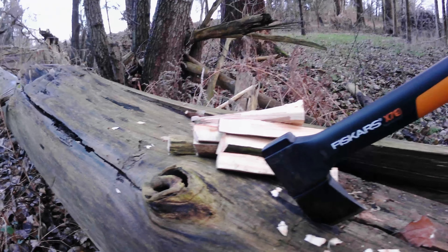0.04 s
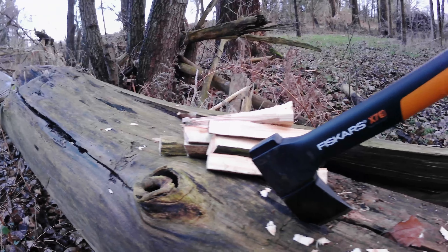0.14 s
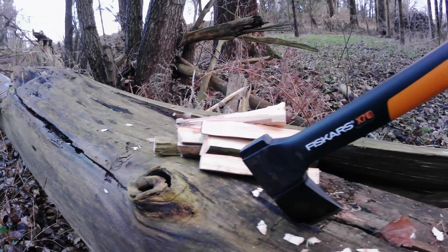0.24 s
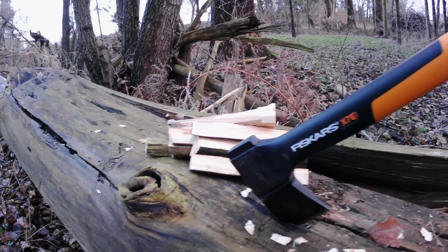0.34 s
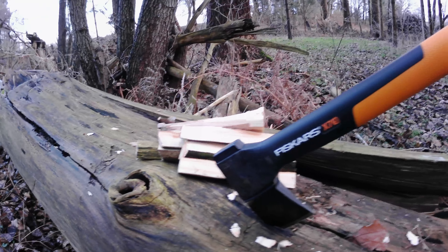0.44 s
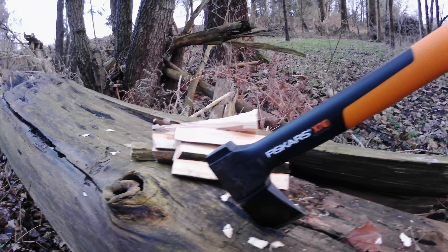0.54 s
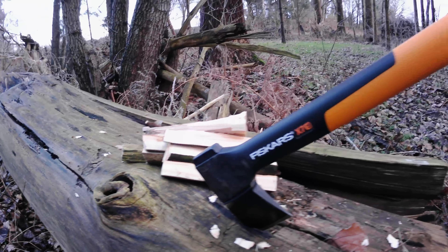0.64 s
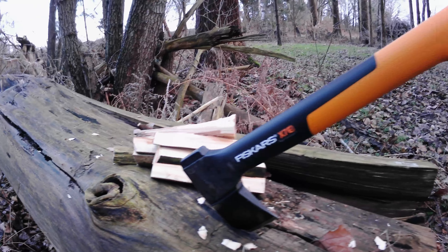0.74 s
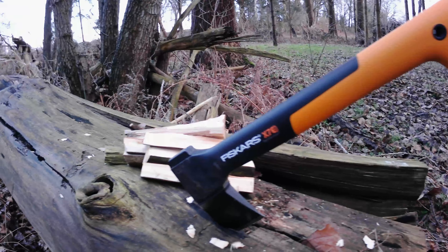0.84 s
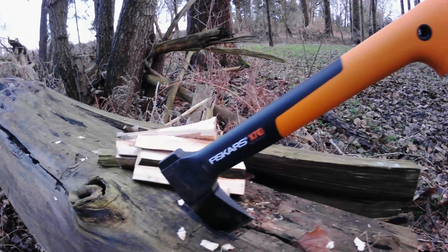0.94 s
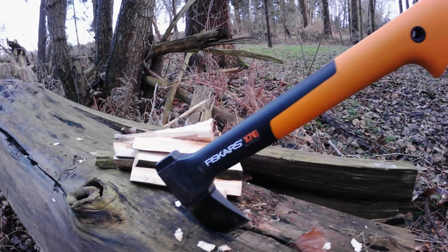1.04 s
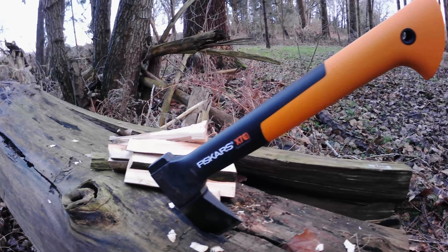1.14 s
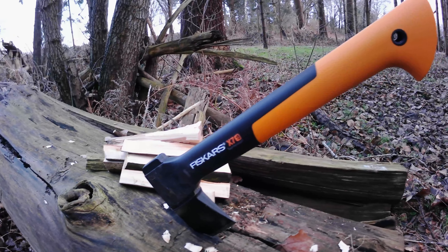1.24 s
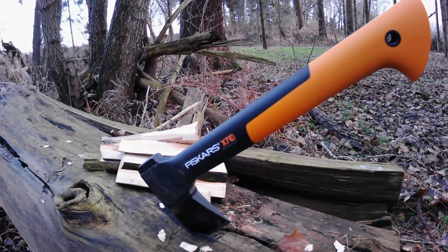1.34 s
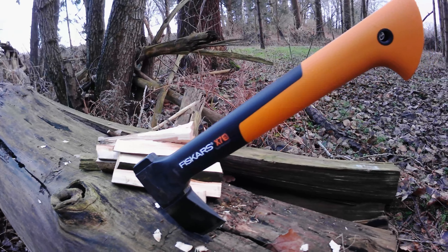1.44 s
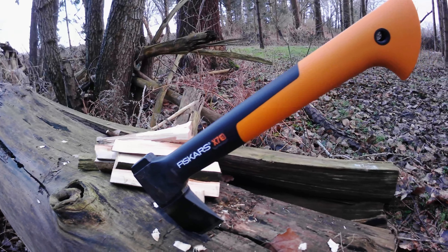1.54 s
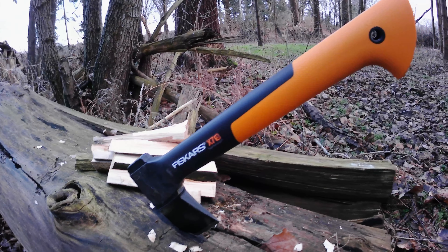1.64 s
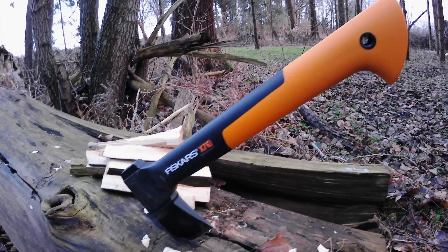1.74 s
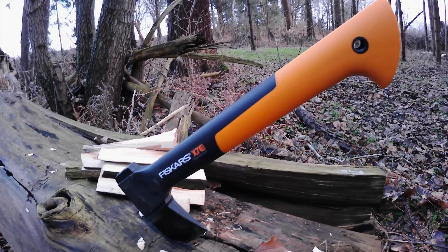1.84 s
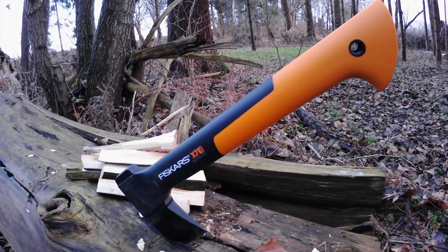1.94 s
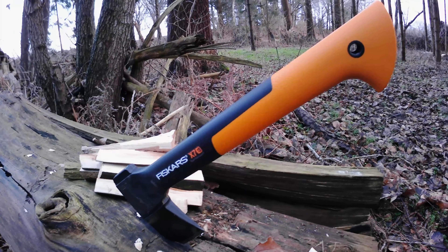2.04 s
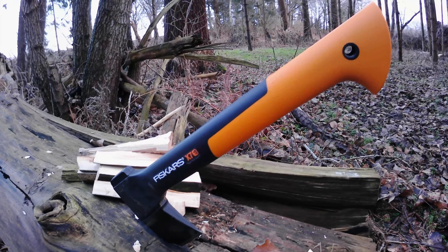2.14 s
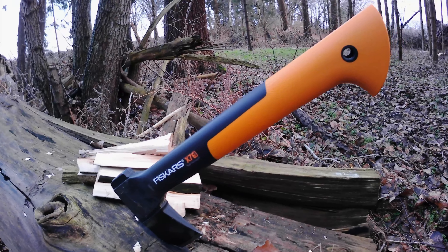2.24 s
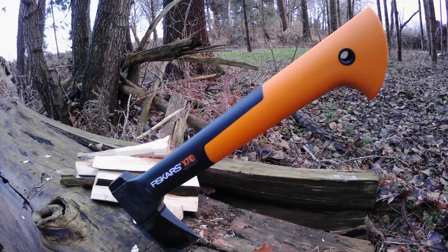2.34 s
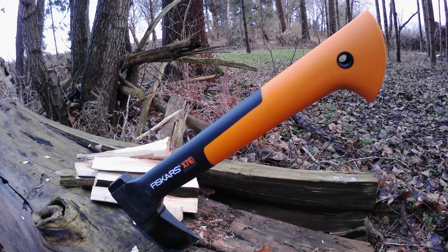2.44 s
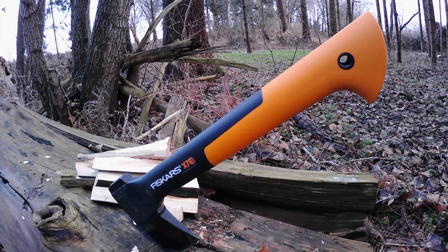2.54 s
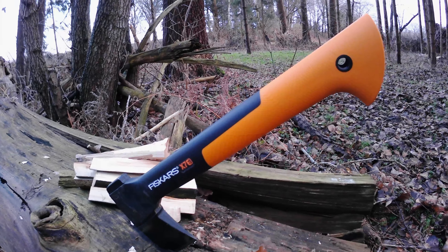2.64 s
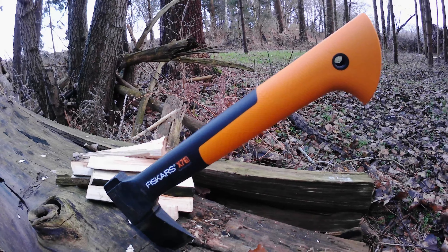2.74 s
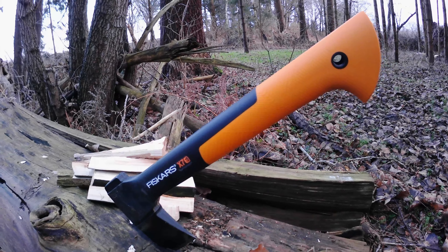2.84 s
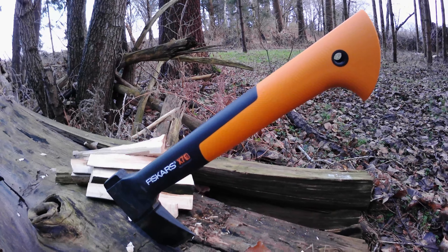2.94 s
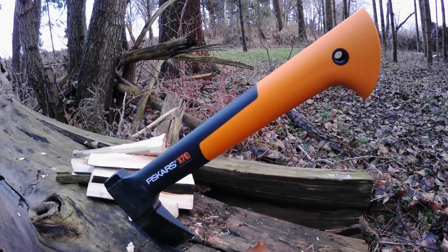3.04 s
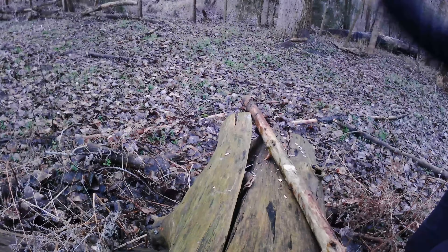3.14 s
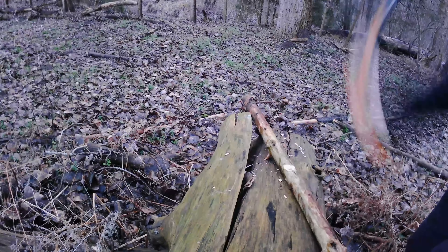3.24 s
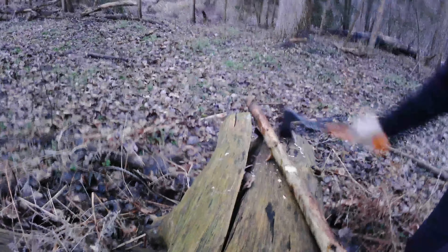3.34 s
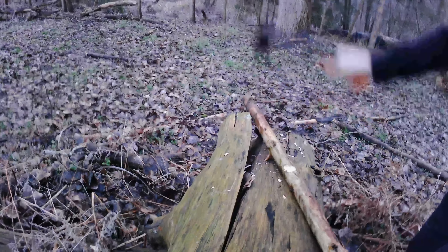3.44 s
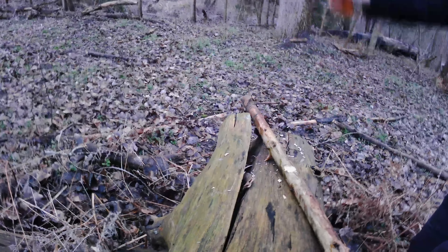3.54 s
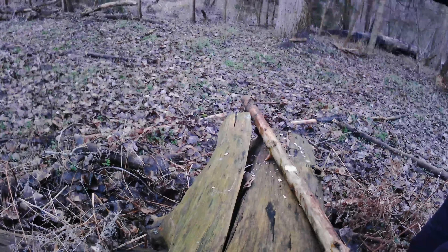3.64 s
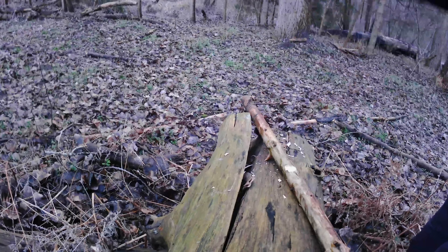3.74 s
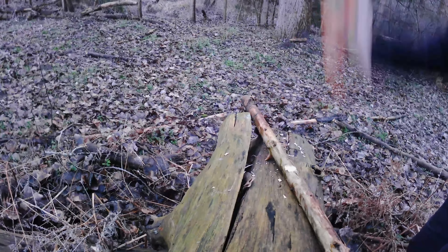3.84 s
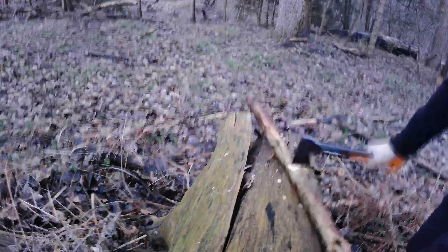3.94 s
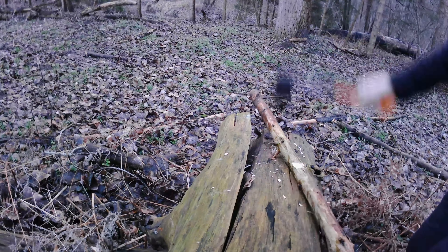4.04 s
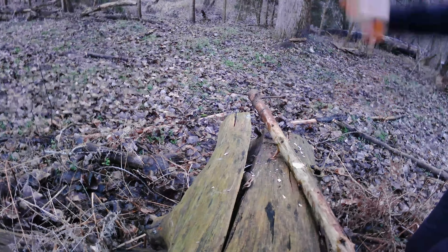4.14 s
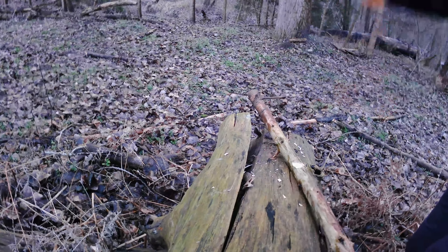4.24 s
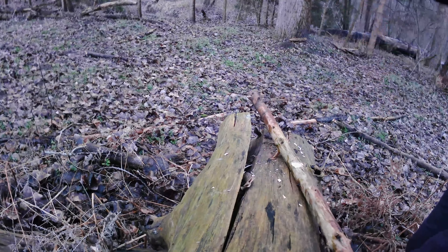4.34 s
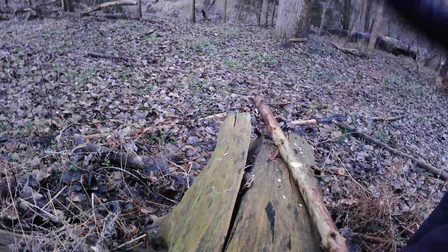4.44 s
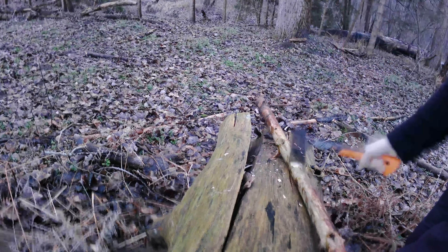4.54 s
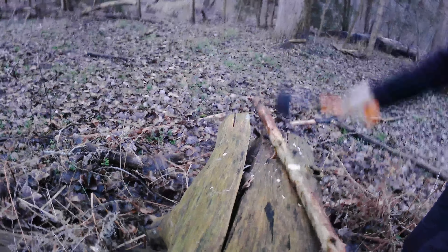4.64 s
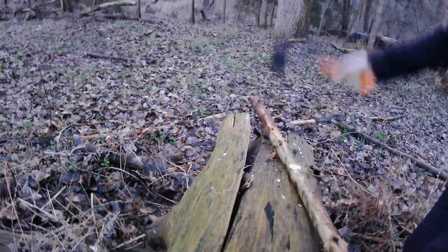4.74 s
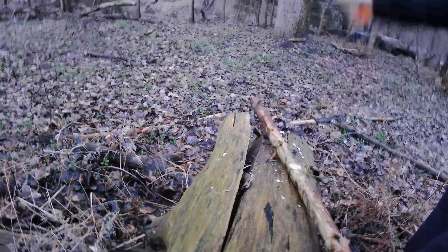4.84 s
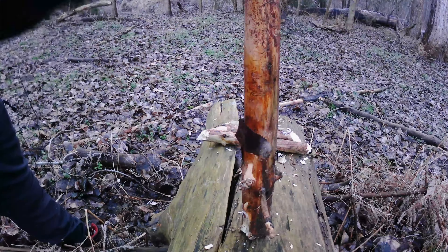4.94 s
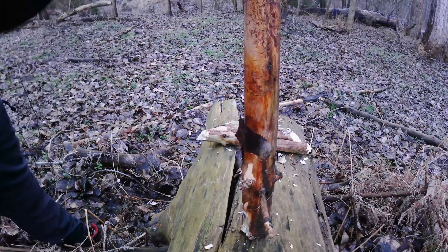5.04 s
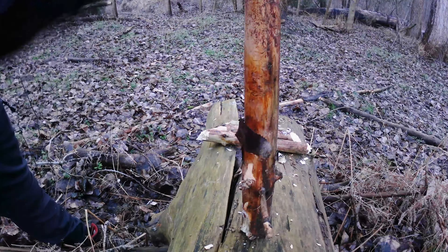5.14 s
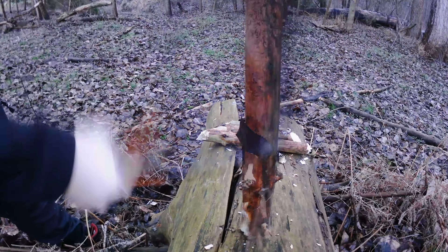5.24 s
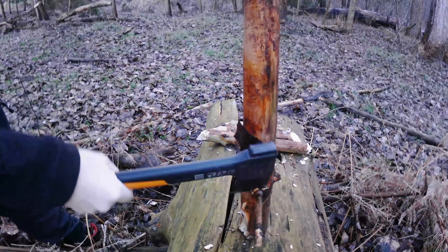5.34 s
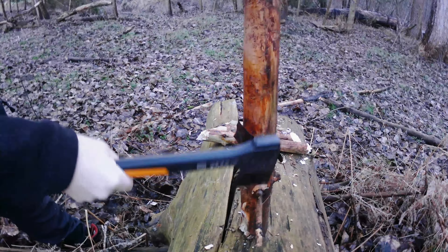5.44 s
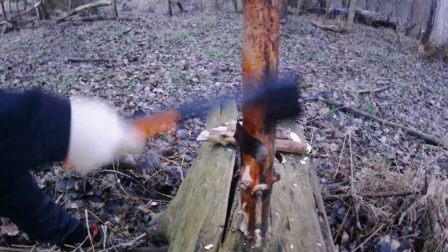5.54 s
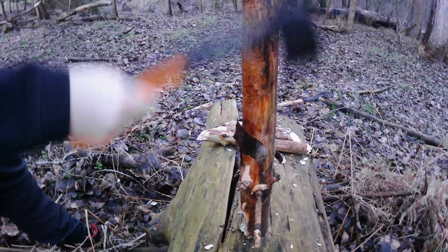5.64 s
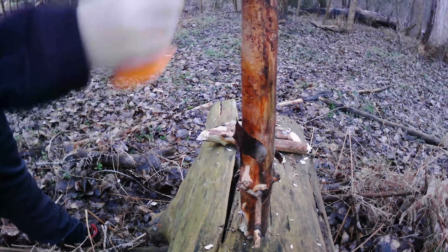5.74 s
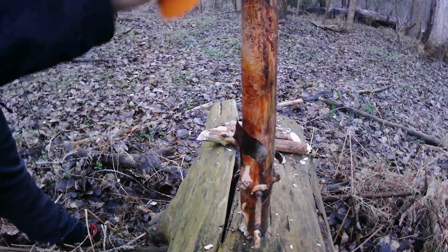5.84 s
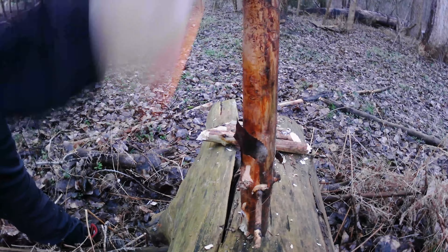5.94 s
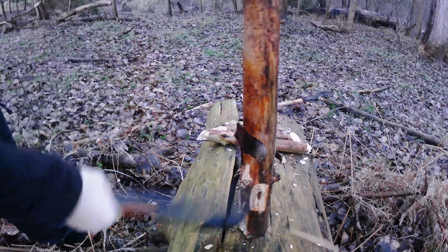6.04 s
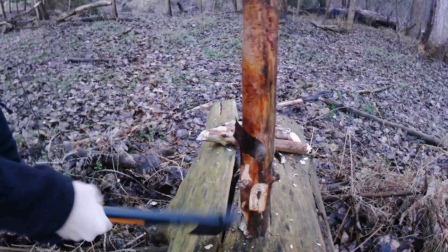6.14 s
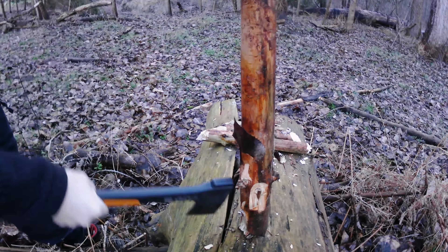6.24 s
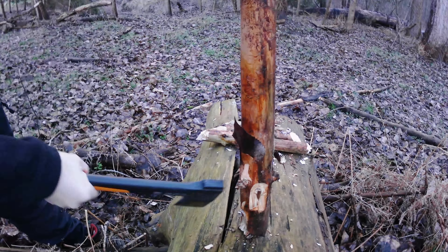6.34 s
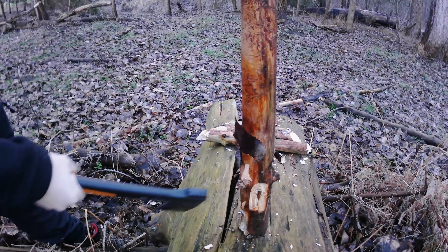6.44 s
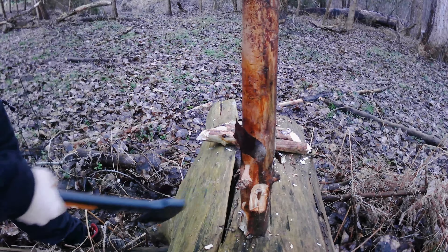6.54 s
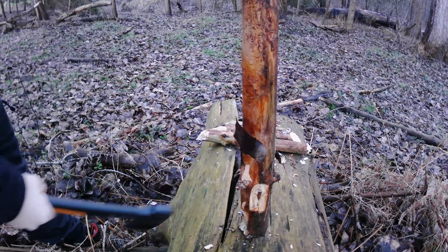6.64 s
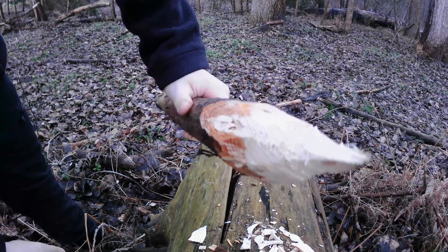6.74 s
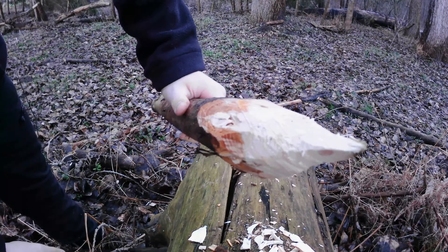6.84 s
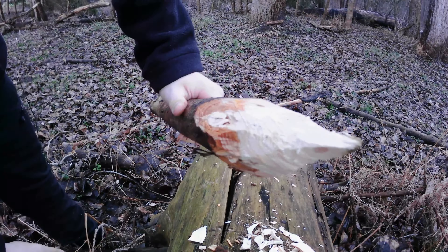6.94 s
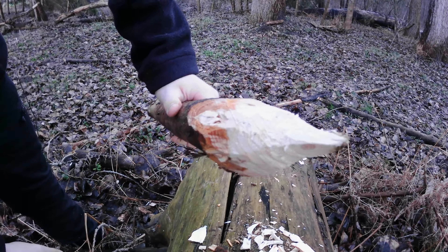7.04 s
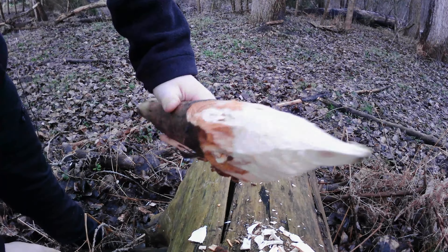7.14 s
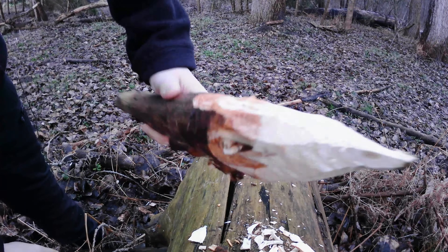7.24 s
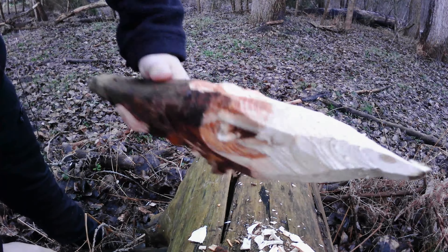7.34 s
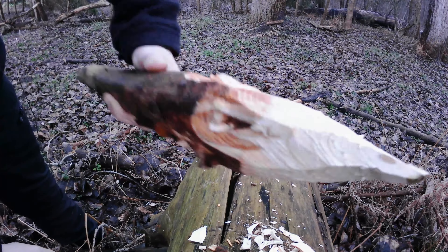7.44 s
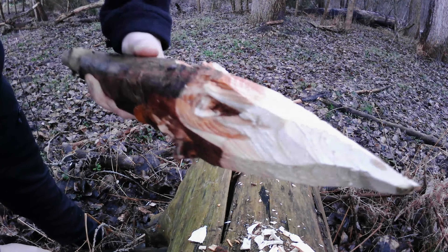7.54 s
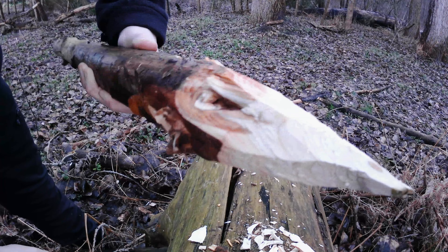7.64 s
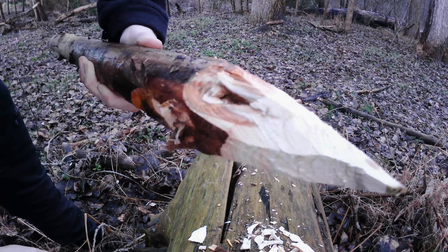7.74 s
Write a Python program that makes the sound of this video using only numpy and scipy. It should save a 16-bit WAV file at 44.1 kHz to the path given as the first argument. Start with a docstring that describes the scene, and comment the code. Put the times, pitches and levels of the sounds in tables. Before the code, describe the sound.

A quiet winter forest, heard close up: soft steady air and a very thin high electronic whine. A faint tick at 0.2 seconds and a tiny far bird chirp at about 2.1 are almost the only early details. At 2.9 a short dry knock lands, followed by a brief dip in level near 3.1. Three loud hatchet blows follow at 3.3, 3.9 and 4.6, hard clacks with hollow pole ringing, low log thud and splintering; chips tick and fall into dry leaves, one tick standing out just after the third blow. From about 5.0 to 6.8 a low wavering hum with rumble appears. Drier, shorter cuts strike at 5.2 and 6.0, the latter followed by quick small knocks, another faint knock near 6.4 and shifting chips. Impacts clip harshly and leave a faint echo among the trunks; then only quiet air and whine remain.

```python
"""Hatchet blows crack into a wooden pole on a fallen log, close up in a quiet winter forest.
One dry knock, three ringing blows on the lying pole, then two short cuts while it stands upright.
Wood is damped modes and shaped noise; tearing fibres, chips and dead leaves are noise bursts and crackle.
Blows overload the microphone and the trunks return a faint echo; behind lie soft air, a bird, a whine and a hum."""
import sys
import numpy as np
from scipy import signal
from scipy.fft import rfft, irfft
from scipy.io import wavfile
from scipy.ndimage import uniform_filter1d

SR = 44100
rng = np.random.default_rng(int(sys.argv[2]) if len(sys.argv) > 2 else 0)


def put_to_file(sound):
    """Save the sound as 16-bit audio at rate SR, in the file named by the first command-line argument."""
    columns = np.atleast_2d(sound).T  # one column per channel
    safe = np.clip(columns, -1, 1)
    whole_steps = np.round(safe * 32767)
    wavfile.write(sys.argv[1], SR, whole_steps.astype(np.int16))


N = 343759
TIME = np.arange(N) / SR
RING = TIME[:SR // 2]  # half a second, in which a blow dies away

# Hatchet blows. Each row: start in seconds, strike place along the pole from 0 to 2, pole ring in dB,
# log thud in dB, dense wood ring in dB, bite pitch in Hz, bite in dB, bite length in seconds,
# splitting in dB, splitting t60 in seconds, chips in dB, chip ring in Hz, chip spray length in seconds.
# The levels are relative gains on each layer.
BLOWS = [ (2.9134, 1.0, -50, -31, -26.5, 1084, 10.5, 0.0017, 3, 0.013, -73, 4000, 0.063),
         (3.2764, 0.13, 3, -2, 7.5, 1243, 9, 0.0056, -11, .044, -32, 4070, 0.074),
         (3.928, 0.67, 4, -5, 1, 1187, -9, .0035, -9, 0.033, -32, 4300, 0.051),
         (4.5765, 1.98, 7.5, -0.5, 4.5, 901, 14.5, 0.0061, -29, 0.046, -29, 3990, 0.084),
         (5.2350, 0.31, -24.5, -9, -7, 1409, 12.5, 0.0037, -16, .043, -37, 2630, 0.039),
         (6.027, 1.8, -31, -5, -1, 1283, 8, 0.0044, -8, 0.053, -32.5, 2900, .125), ]
# Spectrum of tearing fibres and leaf crackle. Each row: frequency in Hz, relative density in dB per Hz.
FIBRES = [(200, 4.5), (900, -1), (1700, 12), (2700, -7.5), (4200, 0.5), (7000, -10.5), (10000, -20),
          (15000, -42.5)]
# Loose chips and leaves shift after the last cut. Each row: start in seconds, length in seconds,
# chips in dB, chip ring in Hz, leaves in dB.
RUSTLE = [(6.431, .034, -35, 1910, -58)]


def undb(db):
    """Decibels to gain."""
    return 10 ** (np.asarray(db) / 20)


def add(track, s, sound):
    """Mix a sound into the track from time s."""
    i = int(s * SR)
    track[i:i + len(sound)] += sound[:N - i]


def unit(x):
    """Scale to rms 1."""
    return x / np.std(x)


def colour(x, points):
    """Give a noise the spectrum of (Hz, dB) points, at rms 1."""
    hz, db = np.transpose(points)
    f = np.maximum(np.fft.rfftfreq(len(x), 1 / SR), 1)
    gain = undb(np.interp(np.log(f), np.log(hz), db))
    return unit(irfft(rfft(x) * gain, len(x)))


def lowpass(x, hz, order=2):
    """Butterworth low-pass."""
    return signal.sosfilt(signal.butter(order, min(hz, SR / 2 - 1), fs=SR, output="sos"), x)


def fade(t60):
    """Exponential decay by 60 dB in t60 seconds."""
    return np.exp(-np.log(1000) * RING / t60)


def mode(hz, t60, phase=0):
    """One damped resonance."""
    return np.sin(2 * np.pi * hz * RING + phase) * fade(t60)


def grains(size, rate, spread_db):
    """Random tiny fractures, rate a second, of very unequal strength."""
    strength = undb(spread_db * np.minimum(rng.exponential(size=size), 4))
    happens = rng.random(size) < rate / SR
    return happens * rng.standard_normal(size) * strength


def swells(table):
    """Smooth rises and falls of level from (s, dB, half length s) rows."""
    return sum(undb(db) * np.exp(-((TIME - s) / half) ** 2) for s, db, half in table)


def forest_air(level_db=-50):
    """A soft, steady far-off rush: shaped noise."""
    # Spectrum of the air. Each row: frequency in Hz, relative density in dB per Hz.
    air_spectrum = [(20, -13), (65, -3.5), (160, -2), (240, 0), (440, -5.5), (900, -4.5), (1400, -7.5),
                    (1750, -13), (2100, -21), (3300, -29.5), (6000, -35.5), (11500, -39), (13000, -53.5),
                    (16000, -69)]
    return colour(rng.standard_normal(N), air_spectrum) * undb(level_db)


def whine():
    """Thin steady lines from the camera's electronics."""
    # Lines of the whine. Each row: frequency in Hz, rms level in dB.
    whine_lines = [(2826, -78), (4247, -82.5), (5652, -87), (7074, -85), (9900, -87.5), (11321, -107.5)]
    return np.sqrt(2) * sum(undb(db) * np.sin(2 * np.pi * hz * TIME) for hz, db in whine_lines)


def hum(waver=0.0051):
    """A low, slightly wavering hum with some rumble around it; it switches on and off."""
    # Swells of the hum. Each row: centre in seconds, rms level in dB, half length in seconds.
    hum_swells = [(5.06, -48, .16), (6.42, -48, .06), (6.74, -45, 0.06)]
    # Swells of its third harmonic. Each row: centre in seconds, rms level in dB, half length in seconds.
    third_swells = [(5.55, -56.5, 0.11), (6.6, -49.5, .2)]
    # Swells of the rumble. Each row: centre in seconds, rms level in dB, half length in seconds.
    rumble_swells = [(5.8, -55, 0.81), (6.39, -44, 0.085), (6.66, -47, 0.179)]
    pitch_hz, level_db = 117.3, -48.5
    start_s, end_s, fade_s = 4.965, 6.775, 0.023
    on = np.clip(np.minimum(TIME - start_s, end_s - TIME) / fade_s + .5, 0, 1)
    hz = pitch_hz * (1 + waver * unit(lowpass(rng.standard_normal(N), 10)))
    phase = 2 * np.pi * np.cumsum(hz) / SR
    rumble = colour(rng.standard_normal(N), [
        (25, -12.0), (80, -6.0), (180, -4.0), (320, -16.5), (700, -23.5), (3000, -54), (12000, -91.0)])
    fundamental = (undb(level_db) + swells(hum_swells)) * np.sin(phase)
    third = swells(third_swells) * np.sin(3 * phase)
    return on * (np.sqrt(2) * (fundamental + third) + swells(rumble_swells) * rumble)


def bird(quaver=0.025, arch=.05):
    """A small far bird: one arched, slightly quavering chirp with a short note before it."""
    # Notes. Each row: centre in seconds, top pitch in Hz, peak level in dB, half length in seconds.
    notes = [(2.034, 3850, -62, .005), (2.085, 4220, -61, .028)]
    out = np.zeros(N)
    wobble = 1 + quaver * unit(lowpass(rng.standard_normal(N), 200))
    for s, top_hz, db, half in notes:
        # the pitch sags by about the arch share half a length from the top
        hz = top_hz * wobble * np.exp(-arch * ((TIME - s) / half) ** 2)
        out += swells([(s, db, half)]) * np.sin(2 * np.pi * np.cumsum(hz) / SR)
    return out


def echoes(x, t60, build_s, dull_hz, thin_hz, db):
    """Scattered outdoor reflections, thinned in the bass and dulled in the treble."""
    t = TIME[:SR]
    scatter = lowpass(rng.standard_normal(SR), dull_hz)
    scatter = scatter - lowpass(scatter, thin_hz, order=1)
    scatter = scatter * undb(-60 * t / t60) * (1 - np.exp(-t / build_s))
    return undb(db) * signal.fftconvolve(x, scatter / np.linalg.norm(scatter))[:N]


def leaves():
    """Short swells of soft crackle as the chips fall into the dry leaves on the ground."""
    delay_s, half_s, stir_db = .065, .036, -18.5  # stir_db is relative to the chips
    stir = swells([(s + delay_s, db + stir_db, half_s) for s, *_, db, hz, spray_s in BLOWS])
    stir = stir + swells([(s + length_s / 2, db, length_s / 2) for s, length_s, *_, db in RUSTLE])
    crackle = grains(N, rate=2500, spread_db=2)
    return stir * lowpass(colour(crackle, FIBRES), hz=6500, order=3)


def chip(hz, ring_db=-2, low_db=-7, high_db=-14, t60=.019):
    """A chip gives a dry snap around its own pitch and a very short ring; peak 1."""
    noise = rng.standard_normal(len(RING))
    snap = colour(noise, [(hz / 4, low_db), (hz, 0), (2 * hz, high_db)])
    tick = snap * fade(t60) + undb(ring_db) * mode(hz, t60)
    tick = lowpass(tick, hz=5300, order=4)
    return tick / np.abs(tick).max()


def patter(length_s, hz, fall_db_per_s, count, pitch_scatter=.1, size_scatter_db=4):
    """A handful of chips at uneven intervals, each with its own size and pitch, weakening over time."""
    out = np.zeros(SR)
    delays = length_s * (np.arange(count) + rng.random(count)) / count
    for delay, (size, pitch) in zip(delays, rng.standard_normal((count, 2))):
        gain = undb(size_scatter_db * size - fall_db_per_s * delay)
        add(out, delay, gain * chip(hz * np.exp(pitch_scatter * pitch)))
    return out


def chips():
    """Every blow throws a spray of chips and a few land late; single ticks stand out and loose chips shift."""
    # The loudest and the stray ticks of chips and twigs, some just after a blow.
    # Each row: start in seconds, peak in dB, ring in Hz.
    ticks = [(0.231, -42, 1700), (3.3468, -39, 4400), (3.7976, -30.5, 1780), (4.276, -31, 1500),
             (4.627, -15, 1690), (4.911, -45.5, 2600), (5.2774, -31.5, 5040), (6.135, -32, 2300),
             (6.181, -32, 1900)]
    first_chip_s = .031
    # chips thrown high come down later, weaker than the spray
    landing_s, landing_spread_s, landing_db = .16, .13, -19.5
    out = np.zeros(N)
    for s, *_, db, hz, spray_s in BLOWS:
        spray = patter(spray_s, hz, fall_db_per_s=101, count=7)
        landing = patter(landing_spread_s, hz, fall_db_per_s=27, count=3)
        add(out, s + first_chip_s, undb(db) * spray)
        add(out, s + landing_s, undb(db + landing_db) * landing)
    for s, db, hz in ticks:
        add(out, s, undb(db) * chip(hz, ring_db=-4.5, low_db=-5, high_db=-21))
    for s, length_s, db, hz, _ in RUSTLE:
        add(out, s, undb(db) * patter(length_s, hz, fall_db_per_s=20, count=4))
    return out


def log_thud():
    """The heavy log under the pole answers low and rings longest."""
    # Modes of the log. Each row: frequency in Hz, t60 in seconds, relative level in dB.
    log_modes = [(135.5, 0.38, -22.5), (164.9, 0.33, -16), (204.3, 0.25, -19.5), (315, 0.36, -22.5),
                 (544, .045, -9)]
    return sum((-1) ** k * undb(db) * mode(hz, t60) for k, (hz, t60, db) in enumerate(log_modes))


def wood_ring(high_t60=0.071, low_t60=.125, split_hz=800, db=-6):
    """Modes too crowded to tell apart, as shaped noise; the high ones die first."""
    # Spectrum of the crowded modes. Each row: frequency in Hz, relative density in dB per Hz.
    wood_spectrum = [(40, -23), (150, -7), (400, 0), (800, -1.5), (1500, -3.5), (2200, -15.5), (4500, -32),
                     (9000, -45), (15000, -57.5)]
    noise = colour(rng.standard_normal(len(RING)), wood_spectrum)
    # filtered forwards and backwards, so that low and high stay in phase
    low = lowpass(lowpass(noise, split_hz)[::-1], split_hz)[::-1]
    high = noise - low
    return undb(db) * (low * fade(low_t60) + high * fade(high_t60))


def pole(place, scatter=0.78):
    """The pole's bending modes swing in alternate directions; the strike place sets how strongly each rings."""
    # Modes of the pole. Each row: frequency in Hz, t60 in seconds,
    # relative level in dB when struck at place 0, at place 1 and at place 2.
    pole_modes = [ (190, .17, -23, -6, -17), (214.5, 0.2, -22.5, -22, -27), (322.5, 0.098, 3, -6, -4),
                  (366, 0.2, -18, -6, -16.5), (407.3, 0.13, -3, 2.5, -2), (463.6, 0.097, -7.5, -2.5, -7.5),
                  (532, 0.16, -17, -10.5, -16), (581, 0.12, -5, -12, -9.5), (664.3, 0.12, 1.5, -5.5, -5.5),
                  (714.2, 0.17, -33.5, -1, -41), (733.5, 0.043, 10, -13.5, -8), (895, 0.042, -0.5, -55, 2),
                  (982.5, 0.069, -12, -27, -9), (1256, 0.12, -15.5, -21, -22.5),
                  (1357, 0.041, -0.5, -13.5, -12), (1660, .04, -31, -29.5, -22.5), ]
    count = len(pole_modes)
    phases = np.pi * np.arange(count) + scatter * rng.standard_normal(count)
    out = np.zeros(len(RING))
    for (hz, t60, *dbs), phase in zip(pole_modes, phases):
        db = np.interp(place, range(len(dbs)), dbs)
        out += undb(db) * mode(hz, t60, phase)
    return out


def bite(hz, length_s, entry_s=0.001):
    """The blade judders as it wedges in: a hard clack that is choked when the wood grips it."""
    # Partials of the clack. Each row: multiple of the bite pitch, relative level in dB.
    partials = [(.4, -8), (.64, -11.5), (1, 0.5), (1.27, -7.5)]
    clack = np.zeros(len(RING))
    for k, (ratio, db) in enumerate(partials):
        clack += (-1) ** k * undb(db) * np.sin(2 * np.pi * ratio * hz * RING)
    entry = 1 - np.exp(-RING / entry_s)
    grip = np.exp(-(RING / length_s) ** 2)
    return clack * entry * grip


def splitting(t60):
    """Fibres tear in a burst of tiny cracks as the edge goes in."""
    return colour(grains(len(RING), rate=4600, spread_db=1.5), FIBRES) * fade(t60)


def hatchet(contact_s=0.00044):
    """Blows ring pole and log, clack and tear; light knocks do not cut. Returns ring and edge apart."""
    # Light knocks as the hatchet follows through. Each row: start in seconds, ringing body in dB,
    # clack pitch in Hz, clack in dB; the levels are relative gains.
    knocks = [(6.0476, -32, 1360, -2.5), (6.085, -22, 715, -36), (6.106, -19, 624, -13),
              (6.372, -43.5, 245, -24.5)]
    knock_pole_db, knock_log_db, knock_clack_s = -8.5, 1.5, .0024  # pole and log against the wood ring
    ringing, cutting = np.zeros(N), np.zeros(N)
    push = 1 - np.exp(-RING / contact_s)
    for (s, place, pole_db, log_db, wood_db, bite_hz, bite_db, bite_s,
         split_db, split_t60, *_) in BLOWS:
        body = undb(pole_db) * pole(place) + undb(log_db) * log_thud() + undb(wood_db) * wood_ring()
        edge = undb(bite_db) * bite(bite_hz, bite_s) + undb(split_db) * splitting(split_t60)
        add(ringing, s, push * body)
        add(cutting, s, push * edge)
    for s, body_db, clack_hz, clack_db in knocks:
        body = undb(knock_pole_db) * pole(place=1.1) + undb(knock_log_db) * log_thud() + wood_ring()
        add(ringing, s, undb(body_db) * push * body)
        add(cutting, s, undb(clack_db) * push * bite(clack_hz, knock_clack_s))
    return ringing, cutting


def scene(dip_db=-22, edge_carry_db=-14):
    """Chopping and its echoes over the quiet background; the level dips briefly once."""
    background = forest_air() + whine() + hum() + bird()
    ringing, cutting = hatchet()
    chopping = ringing + cutting + chips() + leaves()
    ground = echoes(chopping, t60=0.047, build_s=0.0018, dull_hz=6950, thin_hz=298, db=-33.0)
    # the long pole radiates into the forest far better than the small cut does
    carried = ringing + undb(edge_carry_db) * cutting
    trunks = echoes(carried, t60=0.94, build_s=0.069, dull_hz=3480, thin_hz=1200, db=-38.5)
    dip_start_s, dip_end_s = 3.083, 3.152
    dipped = (TIME > dip_start_s) & (TIME < dip_end_s)
    dip = uniform_filter1d(undb(dip_db * dipped), size=400)  # edges smoothed over 400 samples
    return (dip * (chopping + ground + trunks + background))[None]


def record(dry, top_hz=15900):
    """The input clips flat at full scale; the top of the band is rounded and cut."""
    clipped = lowpass(np.clip(dry, -1, 1), hz=14000, order=2)
    return signal.sosfilt(signal.ellip(8, .05, 70, top_hz, fs=SR, output="sos"), clipped)


dry = scene()
out = record(dry)
put_to_file(out)
```